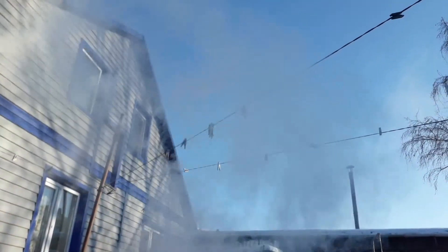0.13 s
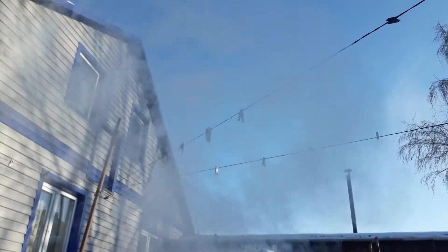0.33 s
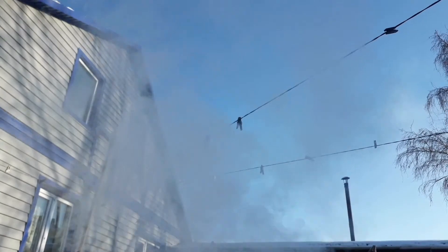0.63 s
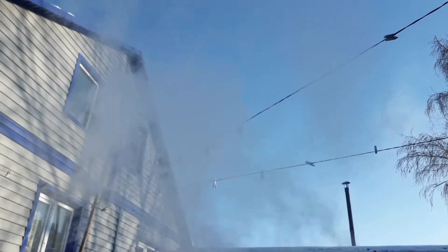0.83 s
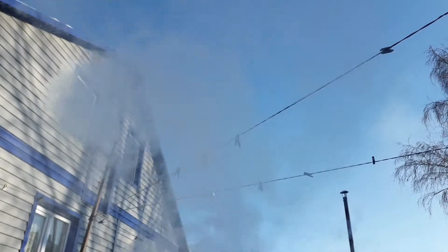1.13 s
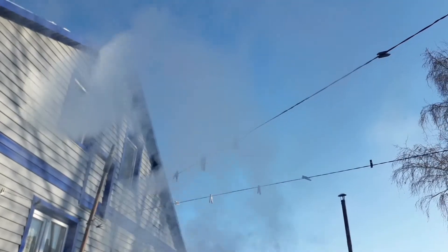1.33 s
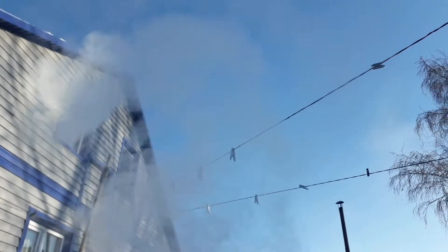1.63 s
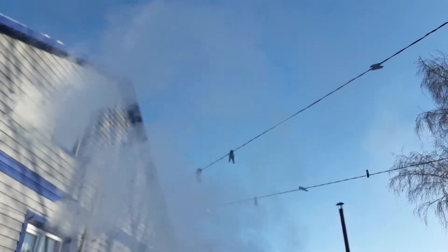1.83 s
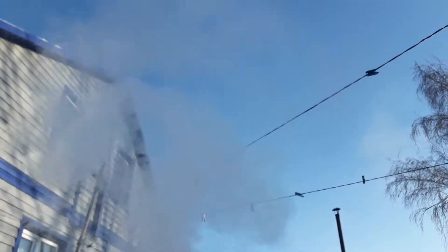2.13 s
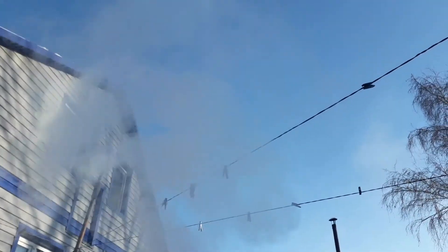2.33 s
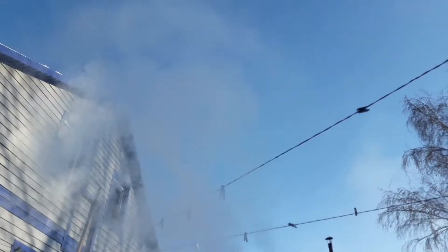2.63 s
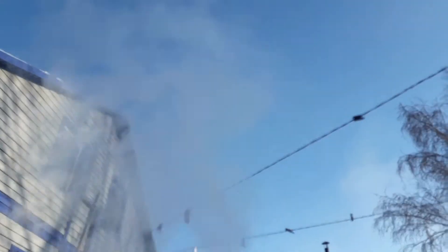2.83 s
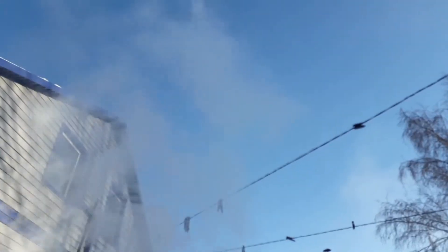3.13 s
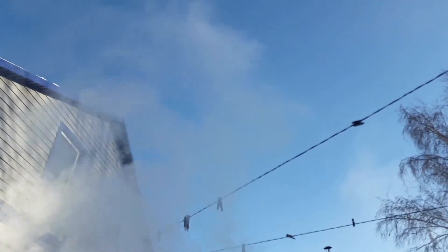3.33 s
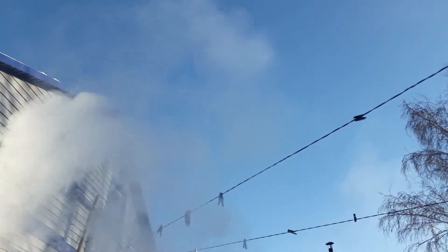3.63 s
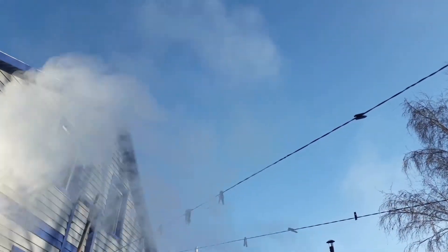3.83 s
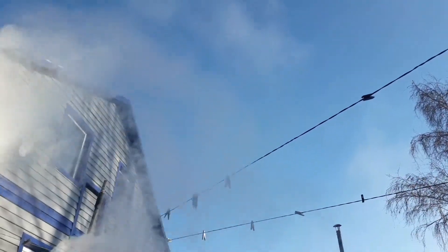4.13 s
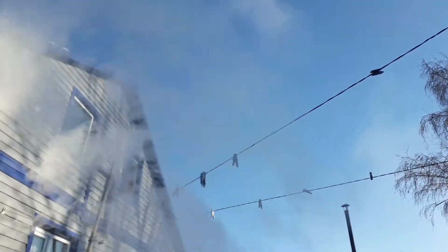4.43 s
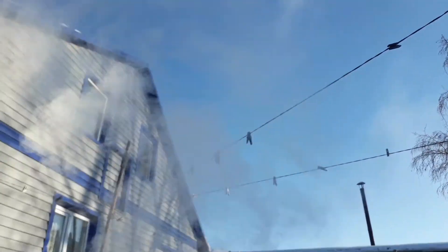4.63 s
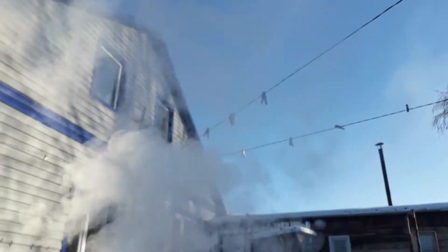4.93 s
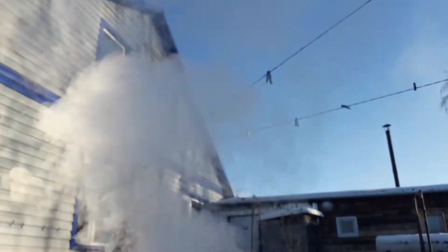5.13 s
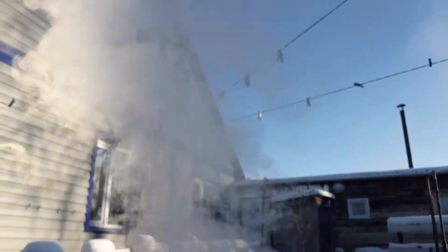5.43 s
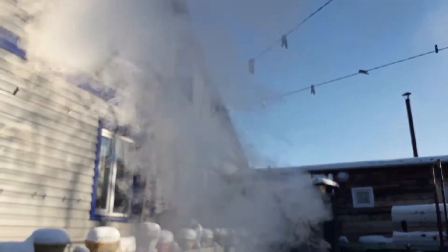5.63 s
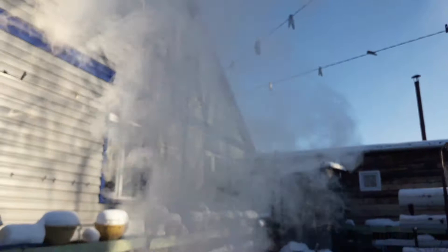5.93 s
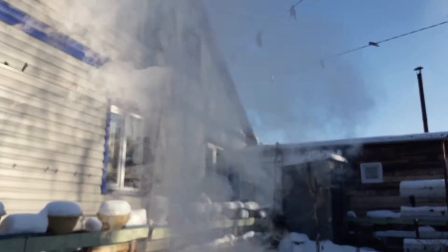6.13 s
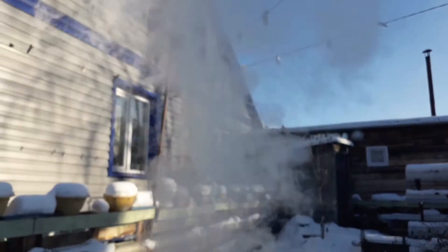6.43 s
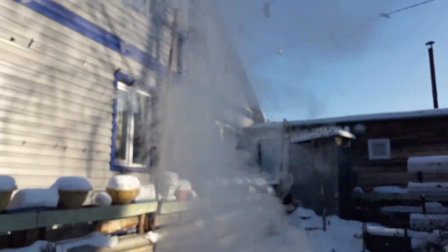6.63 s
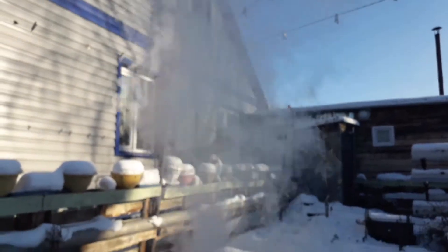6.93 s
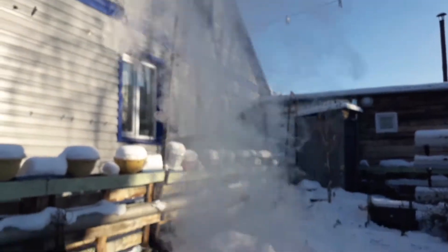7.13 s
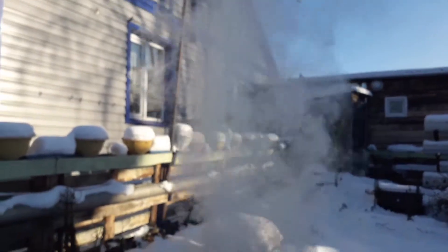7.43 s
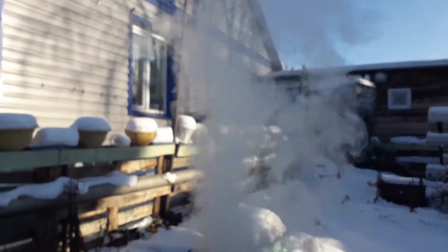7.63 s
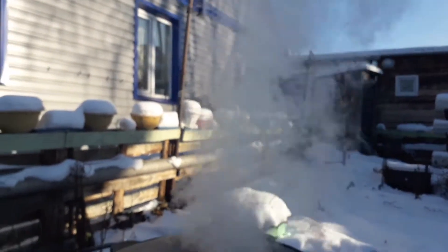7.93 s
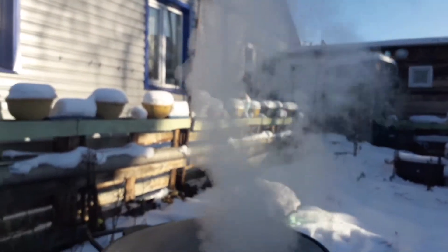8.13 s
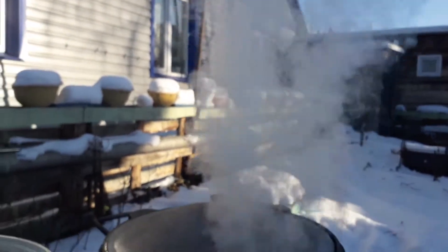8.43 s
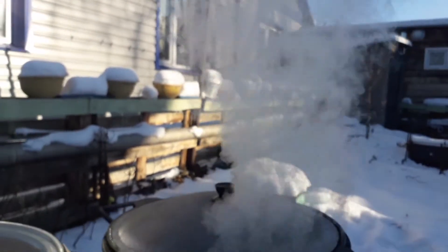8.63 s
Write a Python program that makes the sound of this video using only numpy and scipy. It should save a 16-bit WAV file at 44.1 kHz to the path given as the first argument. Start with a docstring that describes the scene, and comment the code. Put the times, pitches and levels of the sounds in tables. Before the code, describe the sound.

Close, uneven steam sputter with sharp water-drop ticks, a big firewood pop early on, and scattered knocking crackles above a faint fire rumble.

```python
"""Covered pot simmering on a wood stove

Steam hisses and spits at the rim of the lid, a step from a hand-held phone: sputtering noise and
single drops, with short echoes off lid and stove top. The wood pops and thuds (sagging tones with
knock and crack) and flames flutter low underneath (slow random noise). Nearly the same left and right."""
import sys
import numpy as np
from scipy import signal
from scipy.fft import rfft, irfft, next_fast_len
from scipy.io import wavfile
from scipy.ndimage import uniform_filter1d, map_coordinates

SR = 44100
rng = np.random.default_rng(int(sys.argv[2]) if len(sys.argv) > 2 else 0)


def wrap_up_sound(samples):
    """Save the sound to the file named by the first command line argument, as 16-bit audio."""
    columns = np.atleast_2d(samples).T
    # keep every value between -1 and 1, then stretch to whole-number steps
    tamed = np.clip(columns, -1, 1)
    steps = np.round(tamed * 32767).astype(np.int16)
    wavfile.write(sys.argv[1], SR, steps)


N = 387638

# steam at the lid: t/s, thin fizz/dB, hiss/dB, breathy body/dB
STEAM_LEVELS = [(0.0, -62, -59.5, -63.5), (0.41, -62, -61, -62), (1.1, -56.5, -56.5, -68),
                (1.66, -65, -62, -62), (2.23, -67.5, -69.5, -68.5), (2.55, -57.5, -62.5, -65),
                (2.74, -51, -60, -67), (3.16, -60.5, -66, -68), (3.4, -50, -60.5, -69),
                (3.77, -54, -61, -68), (4.13, -50.5, -54.5, -64.5), (4.31, -54.5, -57, -62),
                (4.53, -61.5, -65, -67), (5.53, -57, -63, -65), (5.65, -52.5, -61, -63),
                (5.92, -57.5, -61.5, -59.5), (6.34, -62.5, -66, -64), (6.83, -61.5, -58, -63),
                (7.98, -59.5, -59.5, -67.5), (8.79, -60, -52.5, -58)]
# spectrum of the hiss, phone turned away: f/Hz, relative density/dB
HISS_COLOUR = [(2900, -16.5), (3600, -7.5), (4850, 1), (5600, -5), (7200, -6.5), (8600, -16), (9900, -24.5),
               (11500, -22.5)]
# spectrum of the breathy body, phone turned away: f/Hz, relative density/dB
BODY_COLOUR = [(1400, -10), (1800, -2.5), (2120, -3), (2500, -1), (2900, -3), (3200, -13.5), (4000, -52)]
# spectrum of shrill swells and spits: f/Hz, relative density/dB
SHRILL_COLOUR = [(9500, -45), (11000, -30), (13300, -14), (14000, -3), (15500, 0), (16500, 0)]


def undb(db):
    """Decibels to gain."""
    return 10 ** (np.asarray(db) / 20)


def curves(table):
    """Columns after the time column, interpolated to every sample."""
    s, *columns = np.transpose(table)
    t = np.arange(N) / SR
    return [np.interp(t, s, c) for c in columns]


def colour(x, shape):
    """Filter by (f/Hz, dB) points, scaled so that white noise of rms 1 keeps rms 1."""
    size = next_fast_len(N)
    hz, db = np.transpose(shape)
    bin_hz = np.arange(size // 2 + 1) * SR / size
    gain = undb(np.interp(np.log(bin_hz + 1), np.log(hz), db, left=-90, right=-90))
    gain /= np.sqrt(np.mean(gain ** 2))
    return irfft(rfft(x, size) * gain, size)[:N]


def walk(rate_hz):
    """Random levels held 1 / rate_hz and slewed twice; spread near 1."""
    k = int(SR / rate_hz)
    held = np.repeat(rng.standard_normal(N // k + 1), k)
    return 1.98 * uniform_filter1d(uniform_filter1d(held, k), k)[:N]


def turned(x, away, facing):
    """Crossfade of two colours as the phone turns from the sky to the pot."""
    # t/s, share facing the pot (0-1)
    facing_share = [(0, 0), (1.5, 0.01), (6, 0.08), (7.3, 0.78), (8.79, 0.86)]
    share = np.clip(curves(facing_share)[0], 0, 1)
    return (1 - share) * colour(x, away) + share * colour(x, facing)


def bounce(x, lid_db, stove_db):
    """Echoes off lid and stove top: two delayed copies whose combs drift with the lags."""
    # echo off the lid: t/s, lag/ms
    lid_lag = [(0, .85), (2.2, .85), (2.5, .775), (3.45, .772), (5.6, .865), (6.7, .92), (7.5, 1.01),
               (8.79, 1.06)]
    lid_ms = curves(lid_lag)[0] * (1 + .012 * walk(3))  # the hand is never still
    stove_ms = 1.32 * lid_ms
    lid_echo, stove_echo = [map_coordinates(x, [np.arange(N) - ms * SR / 1000], order=3)
                            for ms in (lid_ms, stove_ms)]
    lid, stove = undb(lid_db), undb(stove_db)
    return (x + lid * lid_echo + stove * stove_echo) / np.sqrt(1 + lid ** 2 + stove ** 2)


def flames():
    """Draught through the firebox and low flutter: noise bands, each wavering by itself."""
    # fire: t/s, low draught/dB, high draught/dB, flutter/dB
    fire_levels = [(0.0, -67, -70.5, -64), (0.51, -66.5, -69, -63), (1.32, -70.5, -74, -69),
                   (1.76, -67.5, -69, -68), (2.08, -74.5, -77.5, -63.5), (2.47, -66, -66.5, -63),
                   (2.76, -73.5, -75.5, -67.5), (3.45, -72.5, -74.5, -66.5), (4.04, -76.5, -77, -67.5),
                   (4.58, -69.5, -71.5, -64), (5.56, -75.5, -73, -67), (5.75, -68.5, -71, -62),
                   (5.95, -61.5, -70.5, -63), (6.63, -75, -71.5, -69.5), (7.37, -66.5, -68, -63.5),
                   (8.01, -75, -74.5, -69), (8.3, -66.5, -65.5, -63), (8.79, -63, -67, -62.5)]
    # low draught spectrum, phone away and facing: f/Hz, relative density/dB
    low_away = [(300, -11), (480, -3), (730, 6.5), (950, -7), (1200, -26.5)]
    low_facing = [(300, -8.5), (480, -1.5), (680, -2.5), (950, -4), (1200, -16)]
    # high draught spectrum, phone away and facing: f/Hz, relative density/dB
    high_away = [(800, -30), (1050, 0.5), (1370, 13.5), (1700, 3.5), (2200, -25)]
    high_facing = [(750, -23), (1000, -1), (1250, 6), (1500, -4.5), (1900, -28)]
    # flutter spectrum: f/Hz, relative density/dB
    flutter_colour = [(20, -24), (40, -1.5), (96, 1.5), (147, -1), (250, -5), (380, -5), (600, -13.5)]

    low_db, high_db, flutter_db = curves(fire_levels)
    air = rng.standard_normal(N)
    low = undb(low_db + 1.2 * walk(16)) * turned(air, low_away, low_facing)
    high = undb(high_db + 1.2 * walk(14)) * turned(air, high_away, high_facing)
    flutter = undb(flutter_db + 1.72 * walk(28)) * colour(rng.standard_normal(N), flutter_colour)
    return bounce(low + high, -8.5, -44) + flutter


def add_pop(out, s, db, hz, knock_db):
    """One pop: a crack, a wooden knock and a push whose pitch settles to the air of the firebox."""
    firebox_hz = 141.7
    t = np.arange(-300, 1500) / SR
    after = np.maximum(t, 0)
    extra_hz = 1.06 * (hz - firebox_hz)
    settling_s = 0.00077 * (1 - np.exp(-after / 0.00064))
    cycles = firebox_hz * t + extra_hz * (np.minimum(t, 0) + settling_s)
    rise = np.exp(-(cycles / 0.44) ** 2)
    fall = np.exp(-(np.abs(cycles) / 0.56) ** 2.2 - 0.18 * hz * after)
    thud = np.where(t < 0, rise, fall) * np.cos(2 * np.pi * cycles + 0.13)
    knock = np.exp(-((t + 0.000305) / 0.0012) ** 2) * np.cos(2 * np.pi * 1350 * t)
    lead = t + 0.33 / hz  # the crack comes a third of a cycle early
    crack = -np.exp(-(lead / 0.00019) ** 2) * np.cos(2 * np.pi * 2600 * lead)
    # louder and woodier pops hold more crack
    crack_db = -5.5 + .3 * db + 0.24 * knock_db
    i = int(s * SR) - 310
    if i > 0 and i + len(t) < N:
        out[i:i + len(t)] += undb(db) * (thud + undb(knock_db - 10) * knock + undb(crack_db) * crack)


def pops():
    """Wood pops: listed ones, faint random ones under them, and a short ragged noise tail from the yard."""
    # pops and thuds: t/s, level/dB, nominal pitch/Hz, knock setting/dB (10 above knock re thud)
    listed_pops = [(0.5513, -42, 137, -18), (1.0887, -51, 400, -15), (1.101, -52, 300, -20),
                   (1.108, -53, 380, -20), (1.7177, -8.5, 680, -9), (2.108, -35.5, 152, -28),
                   (2.28, -40.5, 186, -15), (2.2923, -41, 154, -10), (2.4585, -43, 805, 0),
                   (2.4672, -44.5, 375, -11), (2.5183, -27.5, 583, 4.5), (3.8116, -19.5, 520, -1),
                   (5.0348, -45.5, 181, 1), (5.2294, -34, 190, -13.5), (6.8027, -37.5, 350, -3.5),
                   (6.9338, -29, 194, -18), (7.2583, -33, 182, -18), (7.3796, -43.5, 1000, -16),
                   (8.0693, -33, 191, -12), (8.0891, -35.5, 270, -12), (8.1034, -30, 137, -29),
                   (8.1167, -26.5, 790, -3), (8.2096, -39, 236, -5), (8.4674, -34.5, 186, -7),
                   (8.4957, -31.5, 204, -8), (8.512, -31, 258, -11), (8.517, -33, 860, -19)]
    out = np.zeros(N)
    for row in listed_pops:
        add_pop(out, *row)
    for when, size, pitch in rng.random((260, 3)):
        add_pop(out, when * N / SR, -63 + 10 * size ** 2, 110 * 4 ** pitch, -20)
    t = np.arange(4000) / SR
    yard = rng.standard_normal(len(t)) * np.exp(-t / 0.008) * np.clip(t / .004, 0, 1)
    return out + undb(-53) * signal.fftconvolve(out, yard)[:N]


def swells():
    """Power envelopes of steam swells in three ranges: fast opening, hold, thinning out."""
    # swells of steam noise: t/s, length/s, shrill fizz/dB, broad hiss/dB, whisper/dB
    steam_swells = [(0.16, 0.32, -68, -61, -74), (2.317, 0.152, -54, -53.5, -72),
                    (2.584, 0.13, -56.5, -56.5, -88), (3.173, 0.18, -52.5, -61, -92),
                    (5.443, 0.23, -65, -62, -76), (6.013, 0.17, -68, -62, -75),
                    (6.502, 0.42, -59.5, -62, -84), (7.183, 0.1, -72, -63, -64.5)]
    open_s = .025
    t, out = np.arange(N) / SR, np.zeros((3, N))
    for s, length_s, *db in steam_swells:
        shape = np.clip((t - s) / open_s, 0, 1) * np.exp(-np.abs((t - s) / length_s) ** 4)
        out += np.outer(undb(db), shape) ** 2
    return out


def spits():
    """Drops bursting at the rim: clicks amid a few ms of noise; small ones crowd in when the fizz is fierce."""
    # listed drops: t/s (0.5 ms after the click), nominal level/dB
    listed_drops = [(0.0599, -41), (0.1933, -33), (0.2292, -38), (0.249, -36), (0.269, -43), (0.3252, -42),
                    (0.3749, -45), (1.0513, -41), (1.3605, -47), (1.3985, -39.5), (2.5948, -36),
                    (2.6312, -34), (2.6499, -32), (2.6553, -29), (2.6712, -24), (2.6814, -34),
                    (2.6991, -36), (2.7073, -34), (2.9013, -35), (2.9602, -35.5), (2.9847, -50),
                    (3.01, -38), (3.2035, -31), (3.2417, -24.5), (3.2654, -24.5), (3.2859, -24),
                    (3.2921, -31.5), (3.3031, -26), (3.3059, -29), (3.325, -40), (3.3415, -31),
                    (3.3763, -29), (3.5324, -32), (3.8844, -38), (4.2629, -33), (4.3059, -42),
                    (4.8705, -34), (5.2991, -32.5), (5.4522, -43), (5.5495, -42), (6.5583, -55),
                    (6.5873, -41), (8.3322, -39.5)]
    max_small_per_s, small_over_fizz_db, small_scatter_db = 45, 7, 2.
    fray_sigma_ms = 1.52
    # dull part re shrill part: less as the steam turns shrill and as the drop grows
    dull_offset_db, dull_per_shrill, dull_per_size = -1.5, -1.36, -0.39

    high, low = np.zeros(N), np.zeros(N)
    fizz_db, hiss_db, _ = curves(STEAM_LEVELS)
    fierce_db = 10 * np.log10(undb(2 * fizz_db) + swells()[0])
    when, keep, size = rng.random((800, 3)).T
    at = (300 + when * (N - 600)).astype(int)
    wanted_per_s = max_small_per_s * undb(2 * (fierce_db[at] - fierce_db.max()))
    kept = keep * len(at) * SR / N < wanted_per_s
    small_db = fierce_db[at] + small_over_fizz_db - small_scatter_db * np.log(1 - .9 * size)
    rows = list(listed_drops) + list(zip(at[kept] / SR, small_db[kept]))

    t_ms = np.arange(-250, 251) / SR * 1000
    fray_shape = undb(-13) * np.exp(-.5 * (t_ms / fray_sigma_ms) ** 2)
    for s, db in rows:
        drop = (t_ms == 0) * undb(17) + rng.standard_normal(len(t_ms)) * fray_shape
        i = int((s - .0005) * SR)
        shrillness_db = fierce_db[i] - hiss_db[i]
        dull_db = dull_offset_db + dull_per_shrill * shrillness_db + dull_per_size * (db + 39.5)
        high[i - 250:i + 251] += undb(db) * drop
        low[i - 250:i + 251] += undb(db + dull_db) * drop
    shrill = bounce(colour(high, SHRILL_COLOUR), -0.83, -14)
    dull = colour(low, HISS_COLOUR) + undb(-12.5) * colour(low, BODY_COLOUR)
    return shrill + undb(-3.5) * bounce(dull, -31.5, -12.5)


def bursts(heights, sigma_ms):
    """Spread a train of heights into short round puffs."""
    t_ms = np.arange(-200, 201) / SR * 1000
    return signal.fftconvolve(heights, np.exp(-.5 * (t_ms / sigma_ms) ** 2), "same")


def sputter(rate_hz, spread_db, sigma_ms):
    """Envelope of rms 1: a steady jet with tiny drops bursting in it at random."""
    starts = rng.random(N) < rate_hz / SR
    size = np.minimum(rng.exponential(size=N), 2.7)
    env = 1 + bursts(starts * undb(spread_db * size) / 2, sigma_ms)
    return env / np.sqrt(np.mean(env ** 2))


def steam():
    """One sputtering jet of noise heard in several ranges, most with echoes."""
    # spectra: f/Hz, relative density/dB
    fizz_colour = [(8500, -68), (10000, -29), (11500, -10.5), (13300, -2), (14300, -3), (14900, 3.5),
                   (15500, -2.5), (16500, -10.5)]
    whisper_colour = [(7000, -20), (8800, 1), (11200, -2), (13000, 6)]
    # hiss and body, phone facing the pot: f/Hz, relative density/dB
    hiss_facing = [(2600, 0), (3300, -2.5), (4900, -1), (7200, -0.5), (8600, -5.5), (10000, -20),
                   (11500, -22)]
    body_facing = [(1500, -55), (1800, -5.5), (2110, 3), (2420, 0), (2890, -7), (3400, -10), (4200, -16.5)]

    fizz_db, hiss_db, body_db = curves(STEAM_LEVELS)
    shrill_up, broad_up, whisper_up = swells()
    jet = rng.standard_normal(N) * sputter(rate_hz=120, spread_db=5.0, sigma_ms=0.22)
    jet *= undb(0.71 * walk(22))

    # steady and swell powers add
    fizz_gain = np.sqrt(undb(2 * fizz_db) + undb(3) * broad_up) * undb(0.68 * walk(35))
    shrill_gain = np.sqrt(shrill_up) * undb(2.0 * walk(90))
    hiss_gain = np.sqrt(undb(2 * hiss_db) + broad_up) * undb(0.33 * walk(18))
    body_gain = np.sqrt(undb(2 * body_db) + undb(-18) * broad_up) * undb(1.2 * walk(14))

    fizz = fizz_gain * colour(jet, fizz_colour)
    shrill = shrill_gain * colour(jet, SHRILL_COLOUR)
    hiss = hiss_gain * turned(jet, HISS_COLOUR, hiss_facing)
    body = body_gain * turned(jet, BODY_COLOUR, body_facing)
    whisper = np.sqrt(whisper_up) * colour(jet, whisper_colour)

    # the jet wanders along the rim, so its echoes come and go
    out = bounce(fizz, -15 + 3 * walk(5), -17 + 3 * walk(5))
    out += bounce(shrill, 8, -25)
    out += bounce(hiss, -45, -17 + 4 * walk(3))
    out += bounce(body, -8.5, -28.5)
    return out + whisper


def scene():
    """All sources in the middle, with a faint wavering side signal from two delayed copies."""
    mid = flames() + pops() + spits() + steam()
    side_gain = undb(-35 + 9 * np.clip(walk(12), -3, 1.5))
    side = side_gain * (np.roll(mid, 37) - .6 * np.roll(mid, 41))
    return np.array([mid + side, mid - side])


def record(dry):
    """The phone drops the deepest bass (below 60 Hz) and cuts the top steeply."""
    top_hz = 15850
    low_cut = signal.butter(2, 60, "high", fs=SR, output="sos")
    top_cut = signal.ellip(10, .2, 60, top_hz, fs=SR, output="sos")
    return signal.sosfilt(top_cut, signal.sosfilt(low_cut, dry))


dry = scene()
out = record(dry)
wrap_up_sound(out)
```